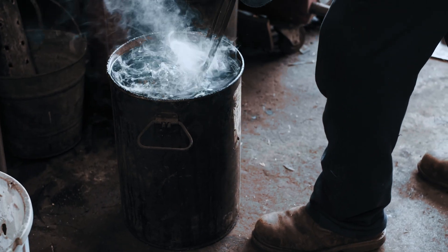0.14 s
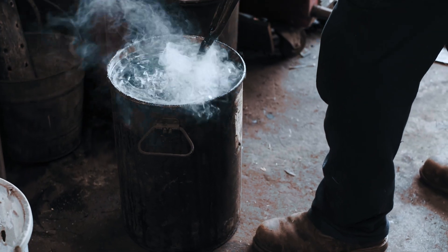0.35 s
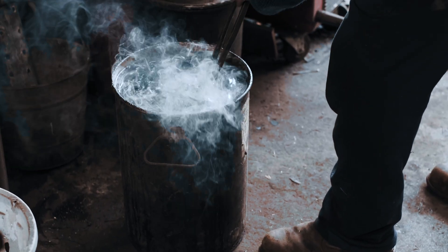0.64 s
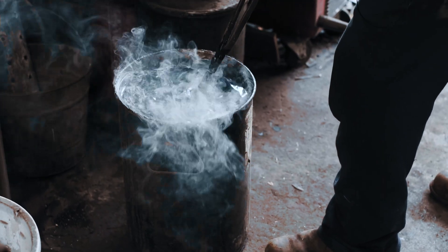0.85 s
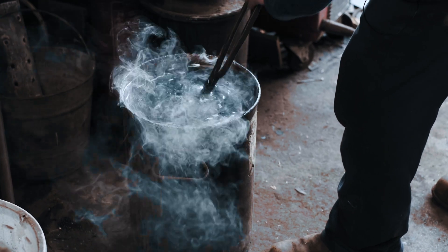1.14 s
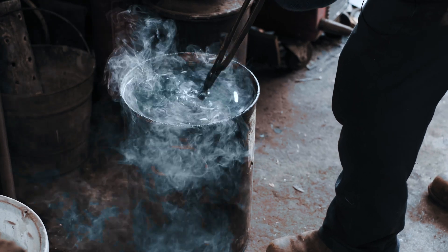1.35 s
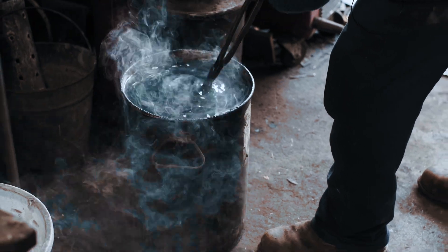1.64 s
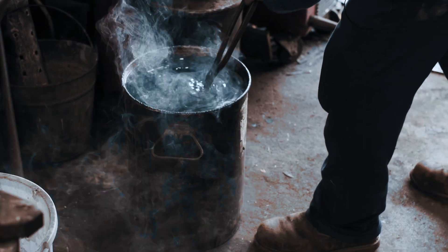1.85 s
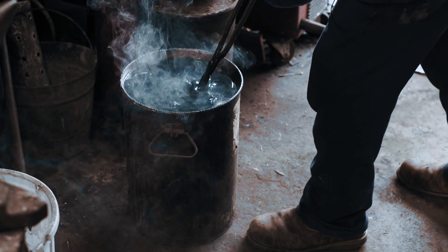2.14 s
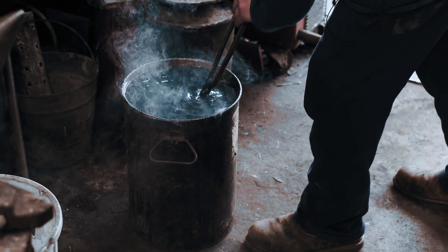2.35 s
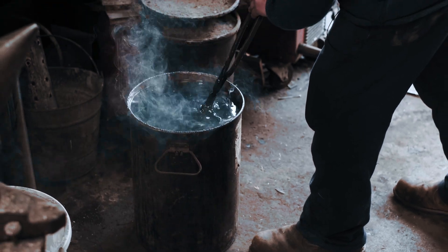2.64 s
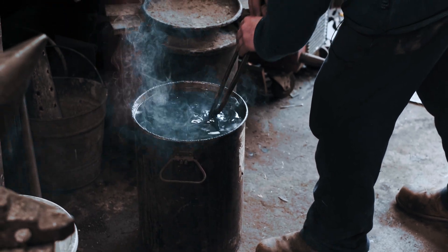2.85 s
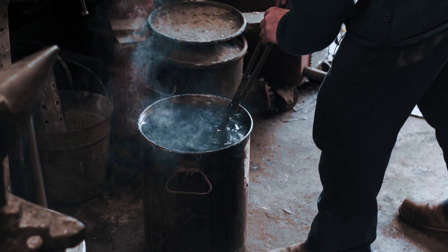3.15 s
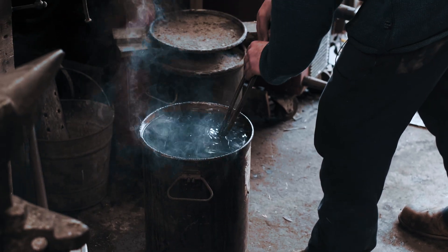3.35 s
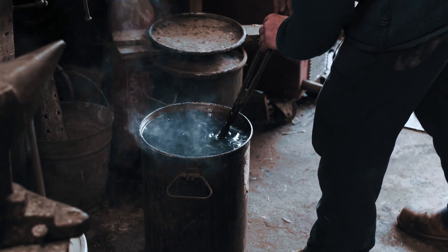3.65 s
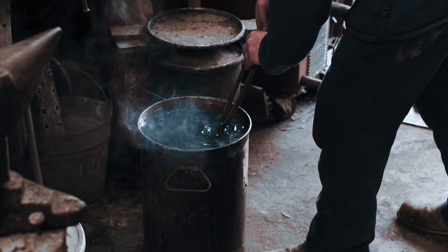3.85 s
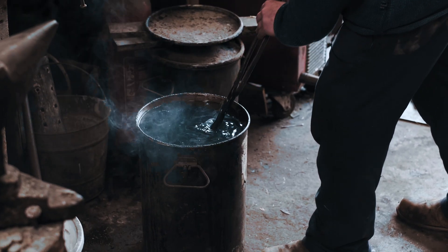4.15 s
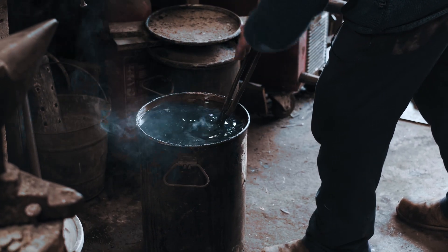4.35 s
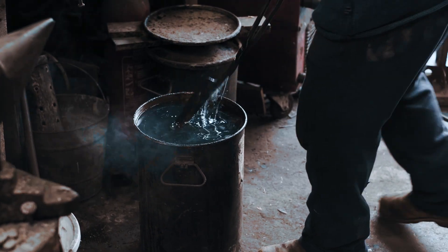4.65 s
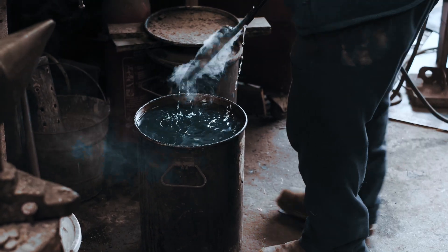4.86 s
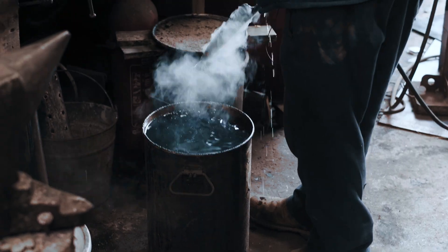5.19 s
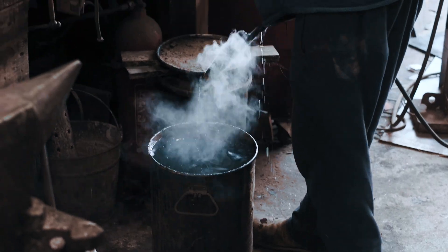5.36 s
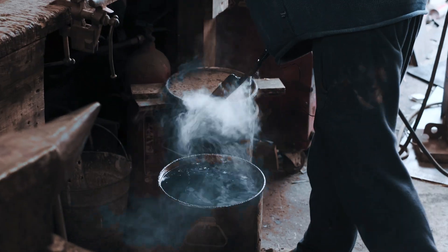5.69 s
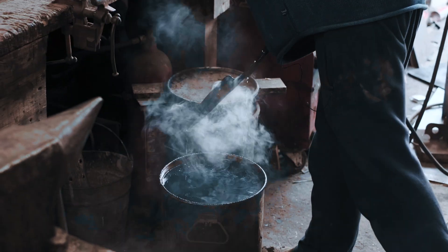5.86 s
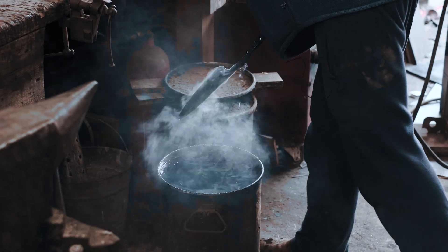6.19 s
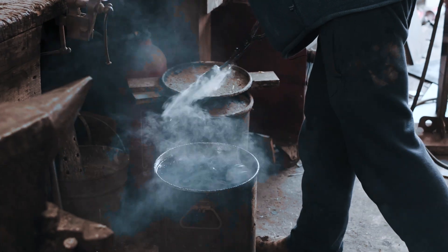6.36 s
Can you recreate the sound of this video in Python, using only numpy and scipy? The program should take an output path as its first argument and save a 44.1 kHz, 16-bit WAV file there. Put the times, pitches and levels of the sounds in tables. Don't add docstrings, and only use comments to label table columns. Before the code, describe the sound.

A quenched blade seethes in an oil drum, the bubbling thinning to bright crackles and drips before a loud wooden knock bounces close by.

```python
import sys
import numpy as np
from scipy import signal
from scipy.fft import rfft, irfft, next_fast_len
from scipy.io import wavfile
from scipy.ndimage import uniform_filter1d

SR = 44100
rng = np.random.default_rng(int(sys.argv[2]) if len(sys.argv) > 2 else 0)


def log_audio(samples):
    frames = np.atleast_2d(samples).T
    limited = np.clip(frames, -1, 1)
    pcm = np.round(limited * 32767).astype(np.int16)
    wavfile.write(sys.argv[1], SR, pcm)


def rack_gain(trim_db):
    fader = np.asarray(trim_db, float)
    return 10 ** (fader / 20)


N = 287695

# [t/s, level/dB]
FIZZ_LEVEL = [(0, -50.5), (.07, -58), (.3, -65), (.45, -49), (.7, -53.5), (1.17, -54), (1.3, -49),
              (1.6, -50), (1.75, -57), (2.02, -57.5), (2.35, -59), (3.3, -69.5), (3.9, -65.5), (6.52, -70)]
# [t/s, lowest pitch of the oil f/Hz, clearness 0-1]
CLEARING = [(0, 2700, .05), (1.9, 2800, .1), (2.25, 3050, .4), (2.52, 3470, .55), (2.78, 3780, .55),
            (3.2, 3880, .55), (3.45, 4060, .75), (3.7, 4180, .95), (4.5, 4310, 1)]
# [t/s, blow level/dB, crack level/dB, pitch factor]
KNOCKS = [
    (2.559, -31, -36, 0.93),
    (2.567, -35, -44, 0.81),
    (2.584, -36, -47, 1.1),
    (6.1634, -2.5, -8, 1.07),
    (6.1756, -19, -38, 0.62),
    (6.1798, -35, -43, 0.79),
    (6.239, -13.5, -18.5, 1.08),
    (6.2536, -17.5, -21, 0.83),
    (6.274, -43, -32.5, 0.78),
]


def pops():
    # [low edge f/Hz, high edge f/Hz]
    pop_bands = [(4600, 9500), (3000, 5200), (9500, 13000)]
    # [f/Hz, level/dB, time to fall 60 dB t/s, share of the pitch
    ring_modes = [(4300, 0, .24, 1), (5170, 2, .14, 1), (6200, -3, .1, .6), (6600, -3, .12, .1),
                  (7750, 1, .07, 0), (8150, 1, .08, 0), (8700, -3, .08, 0), (9600, -6, .06, 0),
                  (10500, -6, .05, 0)]
    s, db, low_db, top_db = collapses()
    t = np.arange(2400) / SR
    shape = len(s), len(t)
    lowest_hz, clear = curves(CLEARING)
    at = np.round(s[:, 0] * SR).astype(int)
    clear_at = clear[at, None]

    lumps = rack_gain(5.5 * unit(uniform_filter1d(rng.standard_normal(shape), size=70, axis=1)))
    snap = rack_gain(3) * decay(t, 0.0016, 0.00072)
    snap = snap + rack_gain(-2.5) * decay(t, 0.011, 0.00011)
    snap = snap + rack_gain(-16) * lumps * decay(t, 0.08, 0.00044)
    mid, low, top = (band(*shape, *edges) for edges in pop_bands)
    top = top + rack_gain(-5) * band(*shape, 12500, 15800)
    low = low * (1.05 - clear_at) ** 0.95
    colour = rack_gain(db + 0.5) * mid + rack_gain(low_db - 1) * low + rack_gain(top_db - 0.5) * top
    sound = placed(s[:, 0], snap * tinted(colour))

    sizzle = lumps * decay(t, 0.072, 0.0019) * band(*shape, 5530, 6900)
    sound += placed(s[:, 0], (1 - clear_at) * rack_gain(db - 11) * sizzle)

    lifted_s = 4.6
    scatter_db = 1.5 * rng.standard_normal((len(s), len(ring_modes)))
    turn = rng.random((len(s), len(ring_modes)))
    seethe = rack_gain(curves(FIZZ_LEVEL)[0] - 38.5) * (np.arange(N) < lifted_s * SR)
    in_oil = (s[:, 0] < lifted_s) * (0.2 + 0.8 * clear[at])
    for k, (hz, level_db, t60, share) in enumerate(ring_modes):
        drive = seethe * (rng.standard_normal(N) + 0j)
        blow_db = low_db[:, 0] + 3 if k == 0 else db[:, 0] + 2
        drive[at] += in_oil * rack_gain(blow_db + scatter_db[:, k]) * np.exp(2j * np.pi * turn[:, k])
        long_gain = (0.11 if k == 0 else 0.17) * clear ** (6 if k == 1 else 2)
        short_gain = 0.8 * (clear if k == 1 else 1)
        swing = long_gain * ringing(drive, t60) + short_gain * ringing(drive, 0.14 * t60)
        stray = (0.03 - 0.023 * clear) * unit(uniform_filter1d(rng.standard_normal(N), size=300))
        pitch_hz = hz * (lowest_hz / ring_modes[0][0]) ** share * (1 + stray)
        sound += rack_gain(level_db) * np.real(swing * np.exp(2j * np.pi * np.cumsum(pitch_hz) / SR))
    return sound


def collapses():
    # [t/s, snap level/dB, depth level/dB]
    muffled = [(.027, -46, -65), (.0443, -39.5, -73), (.0986, -43, -62), (.108, -45.5, -46),
               (.1708, -44.5, -66), (.3723, -47, -53), (.445, -60, -44), (.5734, -42, -67),
               (.5976, -49, -42.5), (.7413, -46.5, -70), (.7913, -47, -49), (.85, -49, -44),
               (.863, -68, -48), (.9133, -39.5, -33.5), (1.0463, -46.5, -66), (1.067, -47, -64),
               (1.093, -47, -63), (1.195, -49, -38.5), (1.211, -42.5, -42), (1.2571, -57, -48),
               (1.2907, -43.5, -48), (1.3005, -61, -39), (1.3497, -39.5, -40), (1.4208, -63, -40),
               (1.448, -44, -30.5), (1.472, -40.5, -50), (1.576, -38, -39), (1.6392, -40, -44),
               (1.6899, -49, -39.5), (1.702, -43.5, -45)]
    # [t/s, snap level/dB, depth level/dB]
    bursts = [(1.788, -40.5, -29), (1.8485, -43, -29.5), (2, -42.5, -36.5), (2.1014, -35, -36.5),
              (2.2021, -38, -36), (2.2281, -37, -52), (2.2406, -36, -31), (2.335, -41, -40),
              (2.402, -35.5, -29), (2.5172, -33, -25.5), (2.591, -40.5, -29.5), (2.655, -34, -26.5),
              (2.6866, -38, -36), (2.77, -36.5, -31.5), (2.822, -40, -32.5), (2.8578, -29.5, -36),
              (2.966, -36, -37.5), (3.069, -37, -34.5), (3.131, -37.5, -31.5), (3.231, -38.5, -37),
              (3.277, -37.5, -42), (3.319, -44, -42), (3.5606, -38.5, -41), (3.608, -47, -43),
              (3.701, -32, -31.5), (3.716, -60, -60), (3.7328, -38, -46), (3.8143, -40.5, -43),
              (3.9243, -38, -36), (4.4299, -35, -39)]
    # [t/s, snap level/dB]
    spits = [(1.882, -47.5), (1.9173, -47.5), (1.9553, -41.5), (1.9767, -40.5), (2.03, -42), (2.0472, -38),
             (2.0885, -47), (2.1515, -37.5), (2.343, -38), (2.4236, -38.5), (2.586, -38.5), (2.6246, -44),
             (2.6438, -39), (2.6709, -40), (2.7053, -38.5), (2.8444, -38), (2.8942, -35.5), (2.913, -34.5),
             (3.0008, -41.5), (3.152, -48), (3.1906, -47.5), (3.3614, -47), (3.4146, -47.5),
             (3.4673, -43.5), (3.5145, -42), (3.6162, -40.5), (3.9454, -46), (3.9722, -45), (4.1719, -48.5),
             (4.4508, -45)]
    # [t/s, snap level/dB]
    stragglers = [(2.1905, -48), (2.277, -48), (2.491, -49), (2.723, -41), (2.8025, -54), (2.812, -48),
                  (3.062, -56), (3.111, -48.5), (3.125, -57), (3.149, -54), (3.183, -54), (3.222, -44),
                  (3.24, -39), (3.251, -52), (3.261, -46.5), (3.311, -59), (3.376, -48), (3.463, -48),
                  (3.4992, -49), (3.531, -56), (3.66, -70), (3.686, -63), (3.3932, -47), (3.542, -52),
                  (3.633, -45), (3.78, -57), (3.804, -56), (3.965, -53), (4.0056, -52), (4.0217, -53),
                  (4.05, -57), (4.131, -56), (4.191, -54), (4.2332, -55.5), (4.2459, -55), (4.336, -56),
                  (4.491, -65), (4.585, -55)]
    parent = np.r_[bursts, bursts]
    lag_s = 0.008 + rng.exponential(0.045, len(parent))
    loss_db = 20 - 4 * rng.standard_normal(len(parent))
    patter = np.c_[parent[:, 0] + lag_s, parent[:, 1] - loss_db]
    small = np.r_[spits, stragglers, patter]
    small = np.c_[small, small[:, 1] - 8.5]
    s, db, low_db = np.r_[muffled, bursts, small].T
    foam_left = 1 - np.interp(s, *np.transpose(CLEARING)[::2])
    top_db = -48 + 0.22 * (db + 46) - 1.5 * foam_left + 4 * rng.standard_normal(len(s))
    return np.array([s, db, low_db, top_db])[:, :, None]


def ringing(drive, t60):
    soft_s = 0.00017
    for pole in (rack_gain(-60 / (t60 * SR)), np.exp(-1 / (soft_s * SR))):
        drive = signal.lfilter([1], [1, -pole], drive)
    return drive / (0.00029 * SR)


def tinted(rows):
    depth_db, width_hz = 3.5, 1500
    z = rfft(rows)
    width = round(width_hz * rows.shape[1] / SR)
    humps = unit(uniform_filter1d(rng.standard_normal(z.shape), size=width, axis=1))
    return irfft(z * rack_gain(depth_db * (humps - depth_db / 9)), rows.shape[1])


def boil(count=1500):
    # [t/s, level/dB, bubble pitch f/Hz]
    boiling = [
        (0, -42.5, 690),
        (.1, -40, 730),
        (.22, -42.5, 484),
        (.35, -41.5, 726),
        (.69, -45, 834),
        (1.02, -45.5, 1050),
        (1.45, -55, 1230),
        (1.7, -56.5, 1120),
    ]
    t = np.arange(1500) / SR
    when, _, pitch_hz = np.transpose(boiling)
    s = 1.75 * rng.random(count)
    spread = np.exp(np.clip(0.362 * rng.standard_normal((count, 1)), -0.3, 0.8))
    hz = np.interp(s, when, pitch_hz)[:, None] * spread
    size_db = np.minimum(-1.5 * np.log(rng.random((count, 1))), 6)
    tone = np.sin(2 * np.pi * hz * t * (1 + 4 * t))
    gurgle = placed(s, rack_gain(size_db) * tone * decay(t, 20 / hz, 0.00025))
    hum = unit(wall(rng.standard_normal(N)))
    return rack_gain(curves(boiling)[0] - 3) * (0.55 * gurgle / np.std(gurgle[:SR]) + 0.51 * hum)


def fizz(count=3400):
    # [f/Hz, level/dB]
    fizz_colour = [(1200, -4.5), (2000, -3.5), (3300, -3), (4300, -10.5), (5900, -5), (7200, -8),
                   (8300, -3.5), (9300, -13), (13000, -13.5), (17400, -31)]
    # [t/s, level/dB, half length t/s]
    puffs = [
        (5.1, -62.5, 0.11),
        (5.5, -57, 0.16),
        (6.55, -54, 0.078),
    ]
    # [t/s, level/dB, half length t/s]
    splash = [
        (.03, -36.5, .022),
    ]
    level = rack_gain(curves(FIZZ_LEVEL)[0]) + swells(puffs)
    t = np.arange(200) / SR
    hz = np.clip(6000 * np.exp(0.5 * rng.standard_normal((count, 1))), 2200, 16000)
    size_db = np.minimum(-4 * np.log(rng.random((count, 1))), 15)
    grains = rack_gain(size_db) * np.sin(2 * np.pi * hz * t) * decay(t, 0.0039, 0.00023)
    spit = coloured(placed(5.9 * rng.random(count), grains), fizz_colour)
    body = 0.5 * spit + 0.82 * rush(fizz_colour, 3)
    top = rush([(7000, -58), (9500, -5.5), (13000, -4), (17400, -5.5)], patchy_db=-4)
    sheen = rack_gain(-65.5) * (level / rack_gain(-54)) ** 0.23 + swells(splash)
    return rack_gain(-4) * (level * body + sheen * top)


def sizzling_foam():
    # [t/s, level/dB, half length t/s]
    spells = [
        (1.06, -62, .06),
        (1.22, -60, 0.022),
        (1.81, -60.5, 0.046),
        (2.02, -54.5, .06),
        (2.14, -59, 0.053),
        (2.33, -62, 0.043),
    ]
    colour = [(4300, -40), (5300, -4), (6100, 0), (7000, -10), (8200, -9), (9500, -30)]  # f/Hz, level/dB
    return swells(spells) * rush(colour, patchy_db=2)


def blips():
    # [t/s, peak level/dB, f/Hz]
    pockets = [(0.4025, -47, 3020), (0.457, -33, 3300), (0.4874, -40, 3200), (0.5097, -41, 3500),
               (0.6554, -43, 5270), (0.827, -42, 3060), (0.8647, -40, 3220), (0.8824, -42, 2760),
               (1.0151, -41.5, 3000), (1.1802, -39, 2840), (1.282, -35.5, 5200), (1.3264, -42, 8330),
               (1.3506, -29, 3840), (1.3997, -40, 8100), (1.4207, -41, 2830), (1.449, -32, 3110),
               (1.5693, -39, 6060), (1.64, -35, 8600), (1.6564, -41, 5690), (1.69, -39, 5270)]
    s, db, hz = np.transpose(pockets)[:, :, None]
    t = np.arange(900) / SR
    rough = rack_gain(3.9 * unit(uniform_filter1d(rng.standard_normal((len(s), len(t))), size=30, axis=1)))
    tone = np.sin(2 * np.pi * hz * t) * decay(t, 0.023, 0.00047)
    return placed(s[:, 0], rack_gain(db - 5.5) * rough * tone)


def glints():
    # [t/s, peak level/dB, f/Hz]
    droplets = [(0.5979, -39, 10800), (0.9132, -45, 11700), (1.0459, -40, 11300), (1.2824, -42, 11500),
                (1.3492, -45, 13500), (1.4954, -42, 9700), (1.5772, -35, 11200), (1.6276, -43, 10600),
                (1.6391, -43, 11300), (1.8481, -40, 9860), (1.9553, -38, 13400), (1.9753, -38, 9400),
                (2.0137, -42, 10100), (2.1025, -36, 11000), (2.1474, -47, 11000), (2.2277, -44, 9000),
                (2.339, -44, 10600), (2.4028, -51, 12200), (2.4028, -39, 10300), (2.4238, -37, 10900),
                (2.4901, -40, 13700), (2.5176, -43, 10400), (2.5864, -48, 9110), (2.6438, -44, 9180),
                (2.769, -40, 10400), (2.8204, -39, 10400), (2.8438, -49, 10100), (2.8573, -33, 9050),
                (2.8932, -36, 10000), (2.9112, -35, 10000), (2.9655, -46, 10200), (2.9655, -39, 9760),
                (3.0683, -47, 13900), (3.0683, -43, 9010), (3.1496, -39, 10800), (3.1821, -42, 11300),
                (3.222, -40, 10500), (3.2299, -34, 9620), (3.3187, -43, 9100), (3.3606, -38, 9690),
                (3.4624, -36, 10600), (3.4993, -43, 12300), (3.5143, -35, 10800), (3.5422, -41, 12800),
                (3.5602, -38, 9070), (3.6076, -31, 10000), (3.7009, -34, 9030), (3.7797, -45, 10500),
                (3.8031, -43, 9020), (3.9234, -35, 14200), (3.9453, -34, 12800), (3.9723, -41, 9800),
                (4.0052, -40, 10300), (4.0501, -42, 11000), (4.1309, -37, 13300), (4.1723, -41, 11200),
                (4.1928, -39, 13600), (4.2322, -46, 10800), (4.3185, -45, 11600), (4.4292, -40, 9100)]
    s, db, hz = np.transpose(droplets)[:, :, None]
    t = np.arange(500) / SR
    tick = 0.84 * np.sin(2 * np.pi * hz * t) + 0.4 * band(len(s), len(t), 8900, 16500)
    return placed(s[:, 0], rack_gain(db) * tick * decay(t, 0.0078, 0.0002))


def drips():
    # [t/s, peak level/dB, f/Hz, time to fall 60 dB t/s]
    drops = [(0.103, -36.5, 1200, 0.059), (1.025, -35.5, 1260, 0.043), (1.19, -30, 2000, 0.0061),
             (1.472, -39, 1520, .03), (2.859, -38, 2400, .005), (2.861, -33.5, 1500, 0.016),
             (3.812, -25, 3100, 0.0052), (4.246, -45, 4000, 0.019), (4.314, -40, 2380, 0.011),
             (4.796, -38, 1300, 0.043), (4.885, -51, 4420, 0.028), (4.912, -30, 1740, 0.021),
             (4.926, -38, 1850, 0.042), (4.945, -46, 1740, 0.075), (4.962, -48, 1740, 0.059),
             (4.98, -51, 1660, .07), (5.002, -45, 2330, 0.027), (5.07, -45, 1454, 0.11),
             (4.988, -43, 1150, 0.023), (4.995, -35, 1150, 0.024), (5.011, -29.5, 1097, 0.023),
             (5.043, -36.5, 1740, 0.017)]
    s, db, hz, t60 = np.transpose(drops)[:, :, None]
    t = np.arange(4000) / SR
    tone = np.sin(2 * np.pi * hz * t * (0.99 + 0.72 * t))
    return placed(s[:, 0], rack_gain(db - 3) * tone * decay(t, t60, 0.00037))


def knock():
    # [f/Hz, level/dB, time to fall 60 dB t/s]
    board_modes = [(184, -4.5, 0.033), (366, 14.5, 0.01), (570, 6.5, 0.013), (1150, 1.5, 0.014),
                   (1390, -3, 0.015)]
    # [f/Hz, level/dB, time to fall 60 dB t/s]
    plank_modes = [(227, -5, .1), (294, 3, .13), (359, -2, .11), (445, -9, .1), (567, -9, .12),
                   (636, -14, .1), (787, -10, .09), (866, -15, .08), (1000, -15, .07), (1110, -12, .07),
                   (1238, -11, .06), (1520, -15, .07), (1860, -24, .06), (2050, -22, .08)]
    s, db, crack_db, pitch = np.transpose(KNOCKS)[:, :, None]
    t = np.arange(SR // 6) / SR
    shape = len(s), len(t)
    ring = np.zeros(shape)
    for hz, level_db, t60 in board_modes:
        strength = rack_gain(level_db + 2 * rng.standard_normal((len(s), 1)))
        ring += strength * np.sin(2 * np.pi * hz * pitch * t) * decay(t, t60, 0.00096)
    for hz, level_db, t60 in plank_modes:
        strength = rack_gain(level_db - 2 + 2 * rng.standard_normal((len(s), 1)))
        ring += strength * np.sin(2 * np.pi * hz * t) * decay(t, t60, 0.0015)
    slap = rack_gain(-7) * band(*shape, 250, 1500) * decay(t, 0.027, 0.0006)
    slap += rack_gain(crack_db - 17) * band(*shape, 1600, 3300) * decay(t, 0.085, 0.0016)
    crack = rack_gain(crack_db) * band(*shape, 1700, 7700) * decay(t, 0.024, 0.0003)
    crack += rack_gain(crack_db - 12) * band(*shape, 8200, 13700) * decay(t, 0.019, 0.0003)
    blows = placed(s[:, 0], rack_gain(db - 12) * (ring + slap + crack))
    no_bass = signal.butter(2, 110, "high", fs=SR, output="sos")
    return signal.sosfilt(no_bass, blows)


def bumps():
    # [t/s, level/dB, thump level/dB, edge level/dB, time to fall 60 dB t/s]
    hits = [
        (1.502, -32.5, -19, -6, 0.44),
        (2.404, -51.5, -4.5, -10, 0.63),
        (2.425, -46.5, -7, -3, 0.29),
        (2.509, -62, 3.5, -17, 0.72),
        (2.99, -52, 0.5, -11, 0.14),
        (4.993, -42, -12, -15, 0.15),
        (5.124, -56, -11, -7, 0.56),
    ]
    s, db, thump_db, edge_db, t60 = np.transpose(hits)[:, :, None]
    t = np.arange(SR // 3) / SR
    shape = len(s), len(t)
    body = rack_gain(-10) * band(*shape, 310, 1780) + rack_gain(thump_db) * band(*shape, 183, 430)
    edge = rack_gain(edge_db) * band(*shape, 1550, 11300) * rack_gain(-60 * t / 0.28)
    thud = placed(s[:, 0], rack_gain(db) * (body + edge) * decay(t, t60, 0.0033))
    return thud + rack_gain(9.5) * wall(thud)


def wall(x):
    # [f/Hz, width f/Hz, level/dB]
    wall_modes = [(476.4, 22, -6.5), (577.6, 8.7, 3), (730, 9.8, 4), (930, 40, -12), (1050, 160, -7.5),
                  (1315, 20, -3.5)]
    m = next_fast_len(N + 8192)
    f = np.fft.rfftfreq(m, 1 / SR)
    answer = sum(rack_gain(db) * 1j * f * width / (hz * hz - f * f + 1j * f * width) for hz, width, db in wall_modes)
    return irfft(rfft(x, m) * answer, m)[:N]


def ticks():
    # [t/s, level/dB]
    scuffs = [(4.28, -49), (4.32, -48), (4.812, -49), (5.21, -48), (5.409, -48), (5.468, -59), (5.502, -48),
              (5.587, -48), (6.196, -53), (6.222, -46), (6.274, -54), (6.356, -55), (6.41, -53),
              (6.45, -63), (6.486, -47.5), (6.505, -46)]
    s, db = np.transpose(scuffs)[:, :, None]
    t = np.arange(1500) / SR
    return placed(s[:, 0], rack_gain(db) * band(len(s), len(t), 3400, 10400) * decay(t, 0.016, 0.00056))


def shop(x):
    # [f/Hz, time to fall 60 dB t/s]
    echo_times = [(100, 0.73), (300, 0.39), (1000, 0.47), (3000, 0.31), (10000, 0.013)]
    hz, t, z = signal.stft(rng.standard_normal(SR // 2), SR, nperseg=256)
    fading = z * rack_gain(-60 * t / along(echo_times, hz)[:, None])
    tail = signal.istft(fading, SR, nperseg=256)[1]
    delayed = np.pad(x, (350, 0))
    return signal.fftconvolve(delayed, tail / np.linalg.norm(tail))[:N]


def air():
    # [f/Hz, level/dB]
    hiss_colour = [(1180, -5), (2000, -15), (2650, -22), (2900, -18), (6250, 6), (16000, 6), (16900, -30),
                   (17400, -31)]
    road_colour = [(70, -52), (130, -6), (300, 0.5), (500, -3), (950, 0), (1500, -4), (2000, -11),
                   (2800, -24.5), (5000, -21.5), (9000, -57)]
    rumble_colour = [(12, -40), (28, -11), (65, -2), (110, -8.5), (200, -12), (400, -24.5), (700, -96)]
    # [t/s, level/dB]
    traffic = [(0, -57), (1.6, -57), (2.3, -62), (3.2, -62), (3.9, -58), (4.5, -62), (5.1, -52.5),
               (6.52, -54.5)]
    # [t/s, rumble level/dB, half length t/s]
    shuffles = [
        (4.15, -71, 0.17),
        (4.7, -57.5, 0.13),
        (5.15, -57, 0.063),
        (5.5, -63, 0.31),
    ]
    rumble = (rack_gain(-62) + swells(shuffles)) * rush(rumble_colour, 0.8)
    road = rack_gain(curves(traffic)[0]) * rush(road_colour, 1)
    return rumble + road + rack_gain(-66) * rush(hiss_colour, 0.37)


def unit(x):
    return x / np.sqrt(np.mean(x ** 2, -1, keepdims=True) + 1e-20)


def along(points, hz):
    f, v = np.transpose(points)
    return np.interp(np.log(hz + 1), np.log(f + 1), v)


def curves(rows):
    s, *cols = np.transpose(rows)
    return [np.interp(np.arange(N) / SR, s, c) for c in cols]


def swells(rows):
    t = np.arange(N) / SR
    return sum(rack_gain(db) * np.exp(-((t - s) / half) ** 2) for s, db, half in rows)


def coloured(x, spectrum):
    m = next_fast_len(N + 8192)
    gain = rack_gain(along(spectrum, np.fft.rfftfreq(m, 1 / SR)))
    return unit(irfft(rfft(x, m) * gain, m)[:N])


def rush(spectrum, patchy_db):
    z = signal.stft(rng.standard_normal(N + 512), nperseg=512)[2]
    field = uniform_filter1d(rng.standard_normal(z.shape), 5, 0)
    field = uniform_filter1d(field, 10, 1)
    patchy = signal.istft(z * rack_gain(patchy_db * field / field.std()), nperseg=512)[1]
    return coloured(patchy[:N], spectrum)


def band(rows, size, lo_hz, hi_hz):
    sos = signal.butter(4, [lo_hz, hi_hz], "band", fs=SR, output="sos")
    return unit(signal.sosfilt(sos, rng.standard_normal((rows, size))))


def placed(times, sounds):
    at = np.round(np.asarray(times) * SR).astype(int)[:, None] + np.arange(sounds.shape[1])
    return np.bincount(at.ravel(), sounds.ravel(), N + SR)[:N]


def decay(t, t60, attack):
    return rack_gain(-60 * t / t60) * (1 - np.exp(-t / attack))


def scene():
    oil = pops() + drips() + blips() + glints()
    blow = knock()
    room = shop(rack_gain(-17) * (oil + blow))
    drum = boil() + fizz() + sizzling_foam() + oil
    return (drum + blow + bumps() + ticks() + room + air())[None]


def band_limit(x):
    return signal.sosfilt(signal.butter(12, 17500, fs=SR, output="sos"), x)


def record(dry):
    t = np.arange(N) / SR - KNOCKS[1][0] - 0.012
    since = np.abs(t)
    jump_db = 6.5 * (t > 0) * np.exp(-since / 0.35) * np.exp(-since / 0.0024)
    mix = dry * rack_gain(jump_db)
    treble = signal.sosfiltfilt(signal.butter(2, 3000, "high", fs=SR, output="sos"), mix)
    sag_s = np.where(t < 0.17, 0.07, 0.2)
    mix = mix - 0.42 * np.exp(-((t - 0.17) / sag_s) ** 2) * treble
    ceiling = 0.304
    mix = mix / (1 + np.abs(mix / ceiling) ** 8) ** (1 / 8)
    mix = signal.sosfilt(signal.cheby2(12, 50, 17750, fs=SR, output="sos"), mix)
    mix = signal.sosfilt(signal.butter(1, 14, "high", fs=SR, output="sos"), mix)
    return band_limit(mix)


dry = scene()
out = record(dry)
log_audio(out)
```